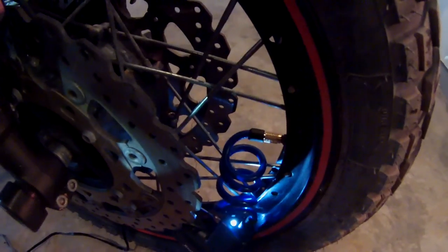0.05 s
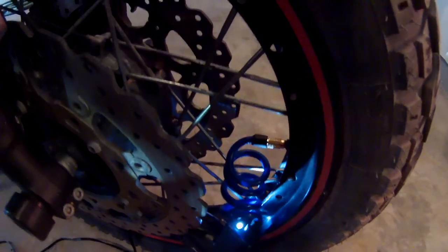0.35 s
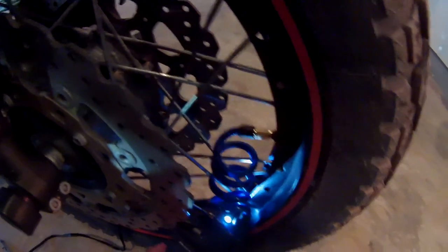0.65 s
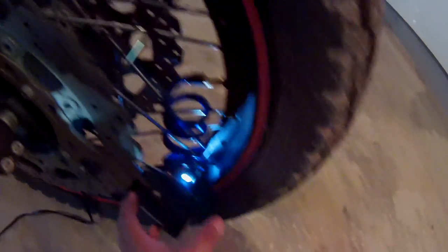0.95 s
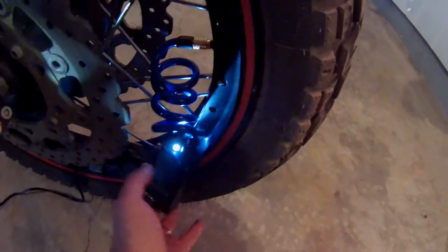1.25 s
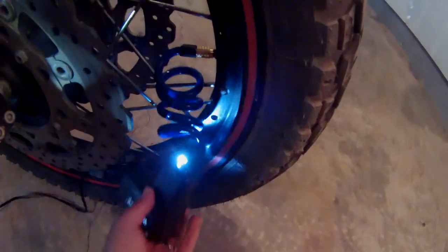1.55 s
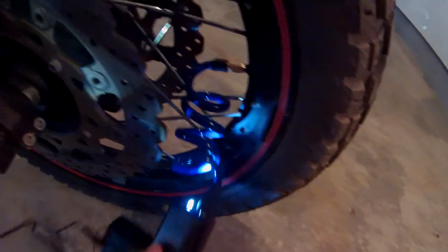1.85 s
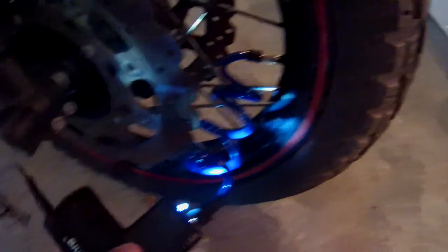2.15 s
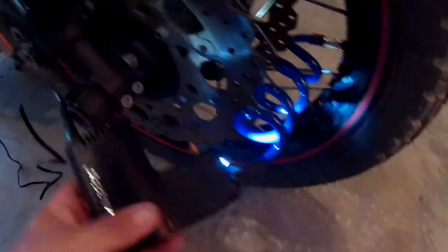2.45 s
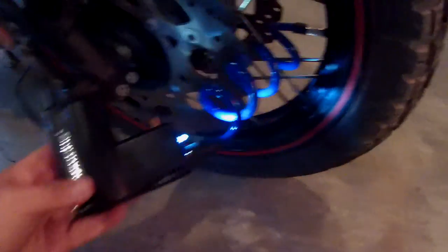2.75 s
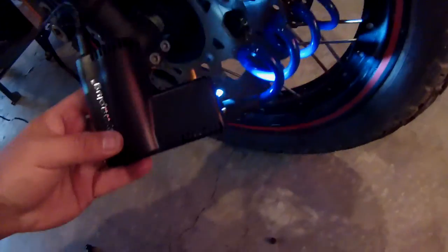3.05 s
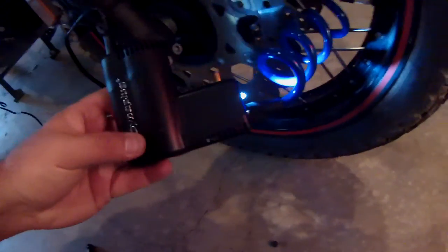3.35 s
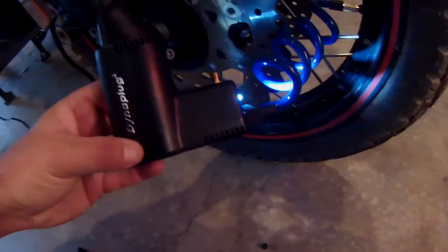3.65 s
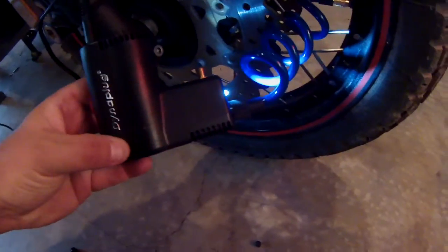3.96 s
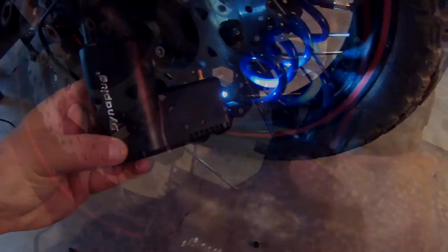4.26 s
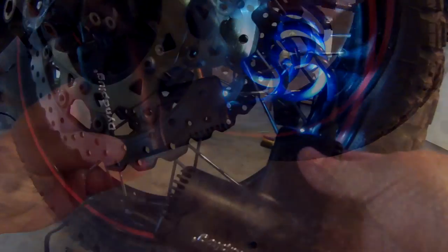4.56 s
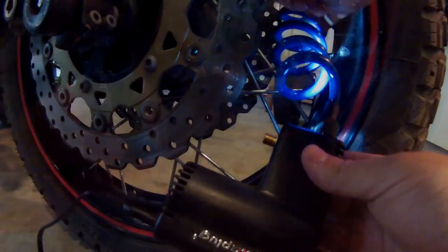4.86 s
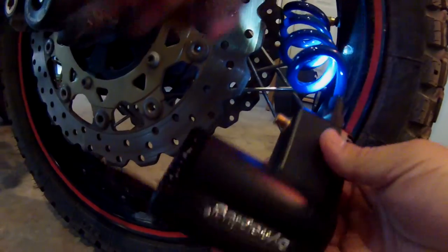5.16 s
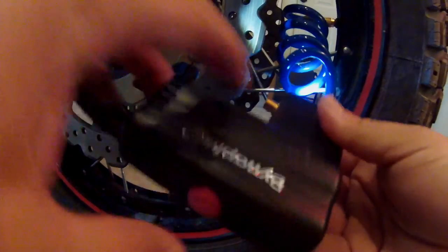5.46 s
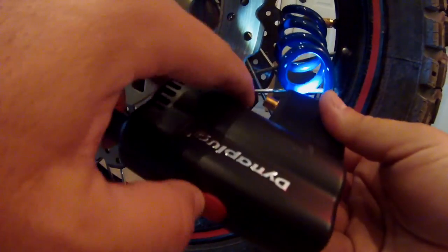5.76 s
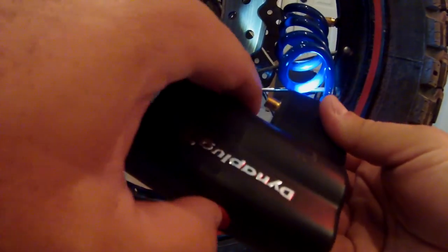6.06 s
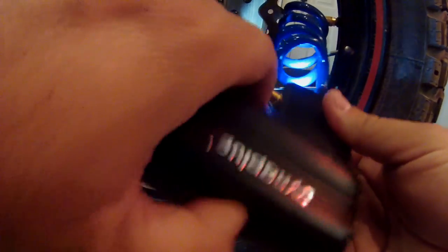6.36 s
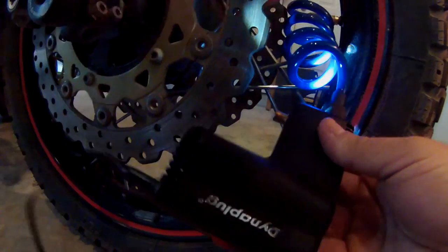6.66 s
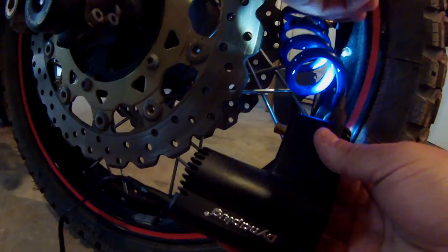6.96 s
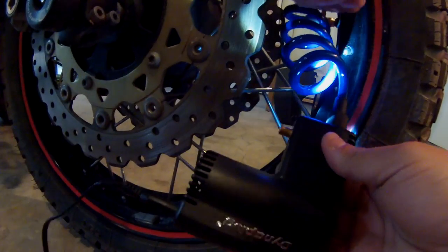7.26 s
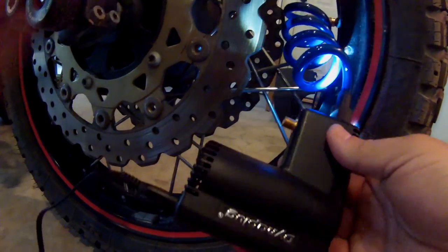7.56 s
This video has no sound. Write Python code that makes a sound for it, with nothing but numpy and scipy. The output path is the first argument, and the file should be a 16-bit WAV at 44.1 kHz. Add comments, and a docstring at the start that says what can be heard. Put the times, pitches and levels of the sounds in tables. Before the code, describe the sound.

A small air compressor buzzes and hisses over an idling motorcycle engine, grows louder, then stops, leaving the engine's deep throb.

```python
"""A hand-held piston compressor fills a motorcycle tyre in a garage; the twin-cylinder engine idles.
On the floor the pump's valve buzzes, its piston knocks and its vents hiss, over exhaust pulses
and ticking tappets. It is lifted at 1.45 s. From 4.4 s the pump sounds closer and louder, and a
deep exhaust throb fades in. Switched off at 6.2 s, the pump stops with a ring of the case; plastic
clicks, fingers rustle and the engine carries on alone."""
import sys
import numpy as np
from scipy import signal
from scipy.fft import rfft, irfft, next_fast_len
from scipy.io import wavfile
from scipy.ndimage import uniform_filter1d

SR = 44100
rng = np.random.default_rng(int(sys.argv[2]) if len(sys.argv) > 2 else 0)


def generate_wav(sig):
    """Save sig (samples, or channels by samples) to the path in sys.argv[1] as 16-bit PCM at SR."""
    pcm = np.round(np.clip(np.atleast_2d(sig).T, -1, 1) * 32767).astype(np.int16)
    wavfile.write(sys.argv[1], SR, pcm)


N = 344421
TIME = np.arange(N) / SR

# engine levels: t/s, thin exhaust/dB, deep exhaust/dB, valve gear/dB
ENGINE_LEVELS = [(0, -32.5, -80, -30.5), (4.1, -33, -56, -30.5), (4.25, -35, -31, -30.5),
                 (4.6, -40, -22.5, -31.5), (5.0, -45, -16, -29.5), (7.8, -68, -16.5, -31.5)]


def from_db(db):
    """Decibels to gain."""
    return 10 ** (np.asarray(db) / 20)


def rms_one(x):
    """Scale to unit power."""
    return x / np.sqrt(np.mean(x ** 2) + 1e-20)


def in_time(rows):
    """Columns of a (t/s, ...) table at every sample."""
    times_s, *columns = np.transpose(rows)
    return [np.interp(TIME, times_s, column) for column in columns]


def drift(corner_hz):
    """Smooth random wander, spread 1."""
    hz = np.fft.rfftfreq(N // 20, 20 / SR)
    slow = irfft(rfft(rng.standard_normal(N // 20)) / (1 + (hz / corner_hz) ** 2))
    return np.interp(np.arange(N) / 20, np.arange(len(slow)), rms_one(slow))


def colour(x, spectrum, size=4096):
    """Minimum-phase filter along (f/Hz, level/dB) points; unit power."""
    hz, db = np.transpose(spectrum)
    grid_hz = np.maximum(np.fft.rfftfreq(2 * size, 1 / SR), 1)
    gain = from_db(np.interp(np.log(grid_hz), np.log(hz), db))
    cepstrum = irfft(np.log(gain))
    cepstrum[1:size] *= 2
    cepstrum[size + 1:] = 0
    response = irfft(np.exp(rfft(cepstrum)))[:size]
    return rms_one(signal.fftconvolve(x, response)[:N])


def crossfade_colours(x, position, spectra):
    """Blend adjacent spectra by fractional index."""
    return sum(np.maximum(1 - abs(position - k), 0) * colour(x, s) for k, s in enumerate(spectra))


def band(x, low_hz, high_hz, order=2):
    """Band-pass; unit power."""
    sos = signal.butter(order, [low_hz, high_hz], "band", fs=SR, output="sos")
    return rms_one(signal.sosfilt(sos, x))


def blows(turn, pattern, jitter_s, spread_db):
    """Impulses at (phase/turn, level/dB) in every turn, scattered in time and level; unit power."""
    impulses = np.zeros(N)
    turns = np.arange(np.ceil(turn[-1]))
    for phase, db in pattern:
        slip, strength = rng.standard_normal((1024, 2))[:len(turns)].T
        times_s = np.interp(turns + phase, turn, TIME) + jitter_s * slip
        at = (times_s * SR).astype(int)
        heard = (at >= 0) & (at < N) & (turns + phase < turn[-1])
        impulses[at[heard]] += from_db(db + spread_db * strength[heard])
    return rms_one(impulses)


def decay(impulses, decay_s):
    """Exponential tail on each impulse."""
    return signal.lfilter([1], [1, -np.exp(-1 / (decay_s * SR))], impulses)


def puffs(impulses, decay_s):
    """Decaying noise burst per impulse; unit power."""
    return rms_one(decay(impulses, decay_s) * rng.standard_normal(N))


def disperse(x, lag_s):
    """Bending waves in a thin shell: lows travel slower, drawing a knock out; lag_s at 1 kHz."""
    size = next_fast_len(N + SR // 4)
    khz = np.fft.rfftfreq(size, 1 / SR) / 1000
    phase_rad = 4 * np.pi * lag_s * 1000 * np.sqrt(khz)
    return irfft(rfft(x, size) * np.exp(-1j * phase_rad), size)[:N]


def garage(x, wet_db, t60_s=0.36):
    """Add the diffuse echo of bare walls."""
    t = TIME[:SR // 2]
    tail = rng.standard_normal(len(t)) * from_db(-60 * t / t60_s) * (t > .005)
    return x + from_db(wet_db) * signal.fftconvolve(x, tail / np.linalg.norm(tail))[:N]


def pump_balance():
    """Position index and part levels: 0 floor, 1 lifted, 2 in hand, 3 sounds closer, 4 tilted, 5 cupped."""
    # per position: t/s, fade time/s, valve/dB, housing/dB, rattle/dB, hiss/dB
    stages = [(0, 0, -27, -34.5, -26.5, -39), (1.45, 0.66, -32, -30.5, -31, -37.3),
              (2.42, 0.5, -29, -36, -34, -38), (4.38, .42, -25, -24.5, -23, -27),
              (4.98, 0.16, -24.5, -25, -21, -27), (5.3, 0.11, -25, -25, -23, -26.5)]
    position = sum(np.clip((TIME - at_s) / fade_s, 0, 1) for at_s, fade_s, *_ in stages[1:])
    levels_db = [np.interp(position, np.arange(len(stages)), db) for db in np.transpose(stages)[2:]]
    return position, *levels_db


def valve(turn, position, snap_turn=.48, flutter_turn=.005, waver_db=1.5):
    """The valve snaps and gusts once a stroke; position sets which harmonics carry."""
    # buzz spectrum: harmonic of stroke rate, on floor/dB, in hand/dB, close/dB
    harmonics = [(7, -32, -30, -15), (8, -30, -25, -27), (9, -29, -26, -14), (10, -25, -23, -18),
                 (11, -15, -21, -18), (12, -9, -11, -10), (13, -8, -8, -12), (14, -3, -10, -10),
                 (15, -18, -15, -3), (16, -15, -1, -10), (17, -18, -27, -24), (18, -21, -13, -14),
                 (19, -12, -20, -26), (20, -21, -25, -18)]
    phase = turn - snap_turn + flutter_turn * drift(7.2)
    buzz = 0
    for harmonic, *levels_db in harmonics:
        db = np.interp(position, [0, 2, 3], levels_db) + waver_db * drift(7.3)
        buzz = buzz + from_db(db) * np.cos(2 * np.pi * harmonic * phase)
    buzz = band(disperse(buzz, lag_s=.008), 350, 1900)
    buzz /= np.sqrt(uniform_filter1d(buzz ** 2, size=SR // 5))  # level held over 0.2 s
    strokes = blows(turn, [(0.061, 0)], jitter_s=0.00037, spread_db=4.5)
    gust = band(puffs(strokes, decay_s=0.01), 895, 1127)
    gust_db = np.interp(position, [2, 3], [-9, -14])
    return buzz + from_db(gust_db) * gust


def housing(turn, position):
    """Piston knock, drawn out by the shell or sharp close up; rod and gears scrape in the case."""
    # piston knock, then its rebound (heard close up): phase/turn, level/dB
    knocks = [(.5, -2), (0.712, -1)]
    # rod and gear contacts: phase/turn, level/dB
    contacts = [(0.019, 8), (0.333, 3), (.54, -7), (0.779, 5.5)]
    # plastic case response, one per position: f/Hz, level/dB
    case_spectra = [
        [(820, -32), (1400, -18), (1520, -14), (1540, -17), (1790, -4.5), (2110, -8.5), (2190, -1), (2320, 1),
         (2800, -9.5), (3170, -13), (3310, -7.5), (3500, -17.5), (3870, -26.5), (4500, -30), (5850, -42),
         (9900, -120)],
        [(820, -33), (1400, -3.5), (1540, -14), (1600, -10), (1690, 1.5), (1820, 0.5), (1950, -9.5), (2490, -3),
         (2640, -7.5), (3130, -10.5), (3260, -2.5), (3470, -20), (4500, -28), (5850, -64.5), (9900, -120)],
        [(820, -37.5), (1400, 1.5), (1610, 1), (2260, 1), (2490, -0.5), (2690, -7), (2930, -3.5), (4120, -19.5),
         (4500, -26), (5850, -48), (9900, -120)],
        [(820, -43.5), (1400, 12.5), (1420, -9), (2060, -2), (2380, 4), (2630, -5.5), (3070, -3), (3940, -18),
         (4500, -32), (5850, -83), (9900, -120)],
        [(820, -40), (1400, -9), (2130, -1), (2360, 0), (2960, -4), (3280, -14), (3580, -10.5), (3770, -28),
         (4500, -10), (5850, -54), (9900, -120)],
        [(820, -53), (1400, -22), (1480, -25), (1570, -7), (1800, -6.5), (1970, -1.5), (2130, 0.5), (2260, 5),
         (2520, -5), (2570, -7), (3170, -8), (3420, -17), (4500, -23), (5850, -27), (9900, -120)],
    ]
    close = np.clip(position - 2, 0, 1)
    drawn_out = disperse(blows(turn, knocks[:1], jitter_s=.00001, spread_db=.8), lag_s=.024)
    sharp = disperse(blows(turn, knocks, jitter_s=.00001, spread_db=.8), lag_s=.003)
    knock = np.sqrt(1 - close) * drawn_out + np.sqrt(close) * sharp
    scrape = puffs(blows(turn, contacts, jitter_s=0.00014, spread_db=0.5), decay_s=0.0028)
    scrape_db = np.interp(position, [2, 3], [-4, -8])
    excitation = knock + from_db(scrape_db) * garage(scrape, wet_db=8)
    return crossfade_colours(excitation, position, case_spectra)


def near_echoes(x, wander=0.018):
    """Palm, rim and floor echoes comb the hiss; the peaks shift as the hand moves."""
    # reflections: delay/s, level/dB
    surfaces = [(.0009, -15), (.0021, -11), (.0034, -11), (.0052, -12)]
    echoes = 0
    for delay_s, db in surfaces:
        lag_s = delay_s * (1 + wander * drift(0.5))
        echoes = echoes + from_db(db) * np.interp(TIME - lag_s, TIME, x)
    return rms_one(x + echoes)


def vent_air(turn, position, tick_db=-15, steady_db=-6, open_s=0.0022, close_s=0.0049):
    """Air spits through the vents twice a turn, over a steady rush."""
    # vent hiss on floor, in hand, close, cupped: f/Hz, level/dB
    hiss_spectra = [
        [(2350, -17), (4000, -6), (4280, -1.5), (4760, -4), (5360, -6), (6090, -2.5), (6700, 2), (7290, -3),
         (9080, 1), (10700, -4), (11300, -10.5), (12500, 0.5), (15300, -23)],
        [(2350, -25), (4000, -4.5), (5390, -6), (6780, 1), (7330, -2.5), (8730, 1), (9990, 2), (11400, -6.5),
         (12600, -3), (15300, -15)],
        [(2350, -38), (4000, -9), (4280, -7), (4550, -10.5), (5570, -12.5), (7930, 2), (8490, -4.5),
         (9180, -1.5), (10400, -3.5), (11400, -12), (12600, -7), (15300, -21)],
        [(2350, -18.5), (4000, -3), (5390, -10), (5510, -8), (6370, 0), (7050, -3.5), (7590, 1), (8880, -1),
         (10400, -2.5), (11400, -7.5), (12400, -4.5), (13800, -9), (15300, -20)],
    ]
    spits = blows(turn, [(0.62, -10), (.15, -4)], jitter_s=0.00025, spread_db=1)
    opening = np.exp(-.5 * ((TIME[:SR // 50] - .01) / (open_s / 2)) ** 2)
    flow = signal.fftconvolve(spits, opening, "same")  # the valve takes a moment to open
    ticks = from_db(tick_db) * rms_one(disperse(spits, lag_s=.008))
    rush = puffs(flow, decay_s=close_s) + ticks + from_db(steady_db) * rng.standard_normal(N)
    spectrum_index = np.interp(position, [0, 1, 2, 3, 5], [0, 1, 1, 2, 3])
    return near_echoes(crossfade_colours(rush, spectrum_index, hiss_spectra))


def compressor(off_s=6.172, coast_s=0.29, body_fade_db_per_s=214, hiss_fade_db_per_s=255):
    """All parts follow the crank; after switch-off, back pressure slows it and the sound dies."""
    # crank speed, sagging as the tyre fills: t/s, stroke rate/Hz
    crank = [(0.0, 71.67), (0.89, 70.019), (1.49, 70.572), (1.69, 70.105), (2.13, 70.137), (2.63, 69.311),
             (3.42, 68.937), (3.82, 68.19), (4.31, 68.618), (4.51, 67.771), (6.15, 67.871)]
    # rattle offset as the pump is picked up and turned: t/s, level/dB
    rattle_offset = [(1.4, -4), (1.72, -4.5), (1.91, 1.5), (2.1, -3.5), (2.43, 0), (2.75, 1)]
    position, valve_db, housing_db, rattle_db, hiss_db = pump_balance()
    since_off_s = np.maximum(TIME - off_s, 0)
    stroke_hz = in_time(crank)[0] * np.exp(-since_off_s / coast_s) * (1 + .001 * drift(8))
    turn = np.cumsum(stroke_hz) / SR
    case = housing(turn, position)
    buzz = from_db(valve_db) * valve(turn, position)
    knock = from_db(housing_db) * band(case, 1440, 2032, order=4)
    rattle = from_db(rattle_db + in_time(rattle_offset)[0]) * band(case, 2247, 4240, order=4)
    body = from_db(-body_fade_db_per_s * since_off_s) * (buzz + knock + rattle)
    hiss = from_db(hiss_db - hiss_fade_db_per_s * since_off_s) * vent_air(turn, position)
    return garage(body, wet_db=-12) + hiss


def exhaust(cycle, gas_db=2, eddy_db=-2):
    """Each firing sends a pressure pulse and a puff of gas down the pipe."""
    # uneven firing of the two cylinders: phase/cycle, level/dB
    firings = [(.065, -4), (.69, -2.5)]
    # thin exhaust note: f/Hz, level/dB
    thin_spectrum = [(28, -31), (50, -8.5), (85, -0.5), (115, -3.5), (150, 0), (195, 4.5), (245, 2),
                     (300, 0.5), (400, -4), (480, -24), (700, -27), (1200, -43.5)]
    # deep exhaust throb: f/Hz, level/dB
    deep_spectrum = [(14, -75), (30, -19.5), (52, 4), (78, 3), (97, -1.5), (108, -10), (120, -7.5),
                     (160, -13), (192, -6), (235, -16.5), (268, -14.5), (305, -23), (450, -32),
                     (800, -58.5)]
    thin_db, deep_db, _ = in_time(ENGINE_LEVELS)
    pulses = blows(cycle, firings, jitter_s=.0003, spread_db=0.5)
    gas = puffs(pulses, decay_s=0.1)
    eddies = band(gas, 92, 16400, order=1)  # keeps the deepest notes steady
    thin = colour(garage(pulses + from_db(gas_db) * gas, wet_db=-4.5), thin_spectrum)
    deep = colour(garage(pulses + from_db(eddy_db) * eddies, wet_db=-2.5), deep_spectrum)
    return from_db(thin_db) * thin + from_db(deep_db) * deep


def valve_gear(cycle, chain_db=1):
    """Tappets tick over cam chain rustle and gear whine."""
    # tappet and chain spectrum: f/Hz, level/dB
    clatter_spectrum = [(30, -52), (220, -7.5), (400, -2.5), (600, -0.5), (1450, -0.5), (1900, -3),
                        (2250, 2.5), (2700, -4.5), (3900, -17.5), (5300, -27), (6700, -13.5), (7800, -20),
                        (10000, -20.5), (15300, -36)]
    # gear tones: f/Hz, level/dB
    gear_tones = [(791, -43.5), (1308, -53), (2159, -47), (2234, -49)]
    taps = blows(cycle, [(.1, -0.31), (.3, -3.1), (.55, -1.3), (.8, -0.026)],
                 jitter_s=.002, spread_db=2.2)
    tappets = puffs(taps, decay_s=0.019)
    chain = from_db(chain_db) * rng.standard_normal(N)
    clatter = colour(tappets + chain, clatter_spectrum)
    clock_s = np.cumsum(1 + .003 * drift(9.8)) / SR  # pitch wavers
    whine = sum(from_db(db + 3 * drift(3)) * np.sin(2 * np.pi * hz * clock_s) for hz, db in gear_tones)
    return from_db(in_time(ENGINE_LEVELS)[2]) * clatter + whine


def dips(cycle, phase_cycle=.12, mean_db=0.3, width_s=0.01):
    """Gain that dips briefly by a random depth each engine cycle, and deeper at listed times."""
    # deepest dips: t/s, depth/dB
    deep_dips = [(.622, 5.2), (.801, 6), (1.293, 5.5), (1.984, 3.5), (2.182, 4), (2.28, 5), (3.188, 4.5),
                 (3.852, 1.5)]
    times_s = np.interp(np.arange(int(cycle[-1])) + phase_cycle, cycle, TIME)
    depths_db = mean_db * np.minimum(rng.exponential(1, 128), 4)
    sag_db = np.zeros(N)
    for at_s, db in [*zip(times_s, depths_db), *deep_dips]:
        near = slice(*np.searchsorted(TIME, [at_s - .03, at_s + .03]))
        bell = np.exp(-((TIME[near] - at_s) / width_s) ** 2)
        sag_db[near] = np.maximum(sag_db[near], db * bell)
    return from_db(-sag_db)


def last_knock(at_s=6.168, ring_hz=2120, rise_s=.005, decay_s=.016, gain_db=-13):
    """As the motor cuts out, the piston's last knock rings the case."""
    t = np.maximum(TIME - at_s, 0)
    envelope = (1 - np.exp(-t / rise_s)) * np.exp(-t / decay_s)
    return from_db(gain_db) * envelope * np.sin(2 * np.pi * ring_hz * t)


def plastic_clicks(decay_s=0.0029, trim_db=-12):
    """Short dry snaps of switch and case."""
    # snaps: t/s, level before trim/dB
    snaps = [(6.2293, -12.5), (6.4336, -18), (7.3782, -21)]
    hits = np.full(N, 1e-18)  # floor against underflow
    for at_s, db in snaps:
        hits[round(at_s * SR)] = from_db(db + trim_db)
    return decay(hits, decay_s) * band(rng.standard_normal(N), 2000, 13000, order=1)


def finger_rustle(at_s=6.95, width_s=0.28, level_db=-51):
    """Fingers shift their grip with a soft rustle."""
    envelope = np.exp(-((TIME - at_s) / width_s) ** 2)
    return from_db(level_db) * envelope * band(rng.standard_normal(N), 7500, 13000)


def scene():
    """Pump in front, idling engine behind; mono."""
    # hunting idle: t/s, four-stroke cycle rate/Hz
    idle = [(0.0, 10.089), (2.31, 10.185), (2.57, 9.868), (3.42, 10.444), (4.78, 9.823), (6.29, 9.791),
            (6.49, 10.632), (7.0, 9.391), (7.8, 9.981)]
    cycle = np.cumsum(in_time(idle)[0]) / SR
    throb = exhaust(cycle)
    machinery = dips(cycle) * (compressor() + valve_gear(cycle))
    return (throb + machinery + last_knock() + plastic_clicks() + finger_rustle())[None]


def record(dry):
    """Steep low-pass at 15.3 kHz."""
    return signal.sosfilt(signal.ellip(12, .1, 90, 15300, fs=SR, output="sos"), dry)


dry = scene()
out = record(dry)
generate_wav(out)
```